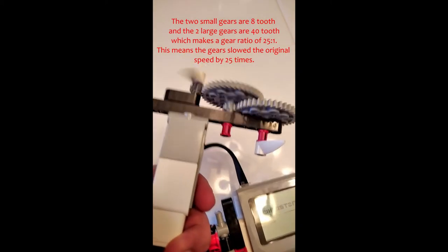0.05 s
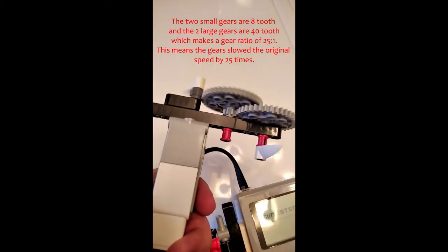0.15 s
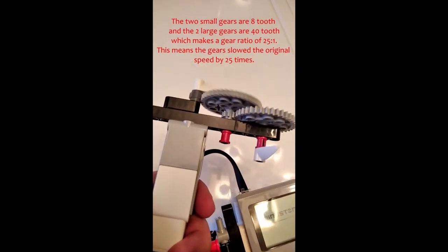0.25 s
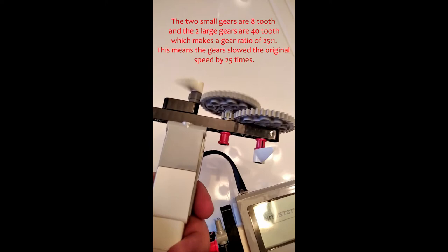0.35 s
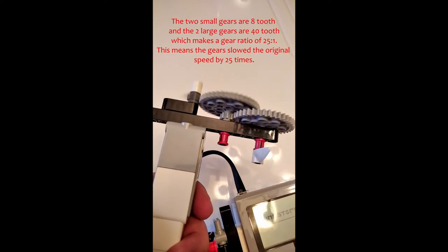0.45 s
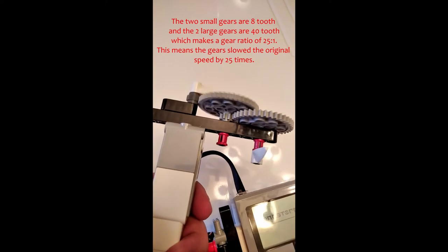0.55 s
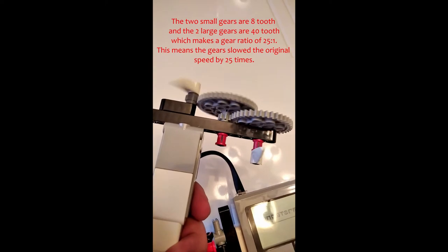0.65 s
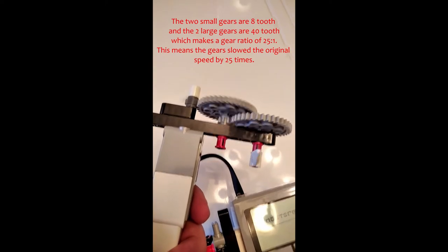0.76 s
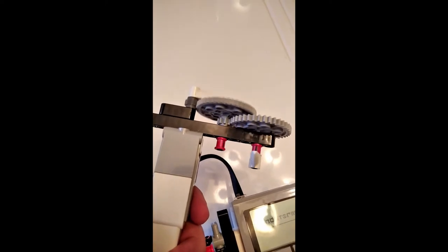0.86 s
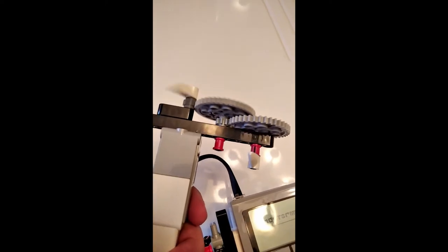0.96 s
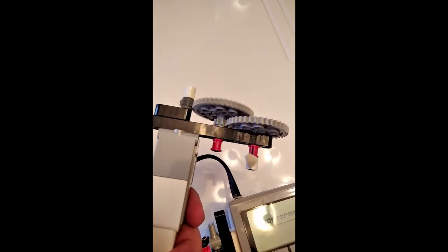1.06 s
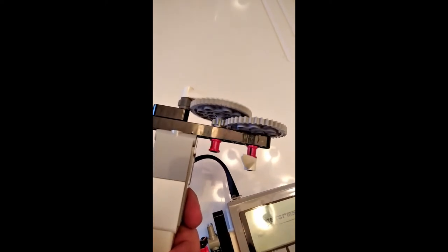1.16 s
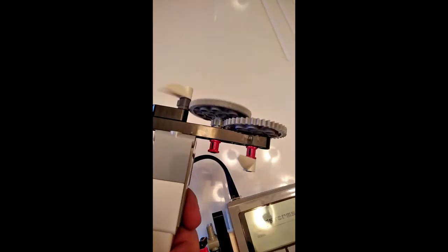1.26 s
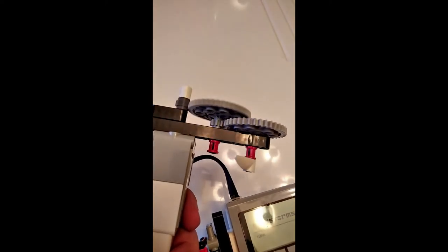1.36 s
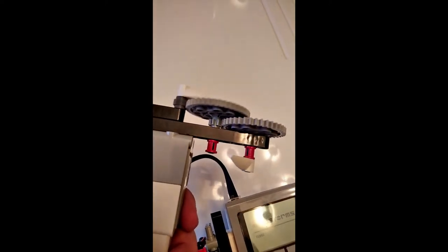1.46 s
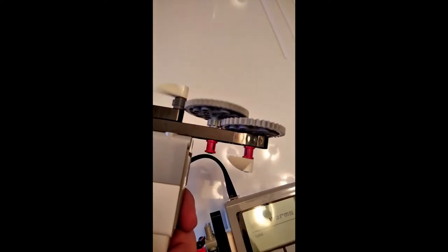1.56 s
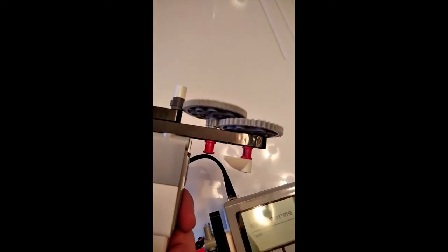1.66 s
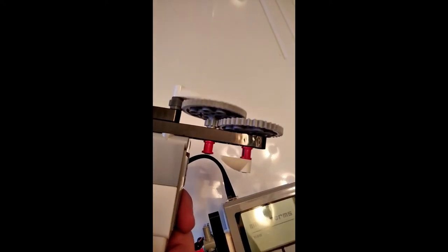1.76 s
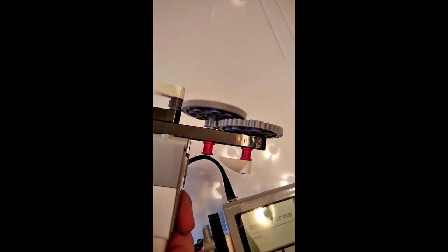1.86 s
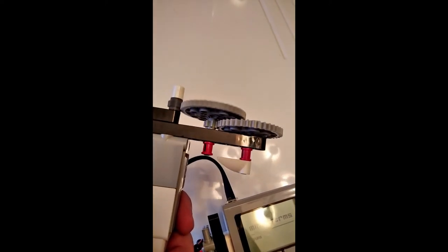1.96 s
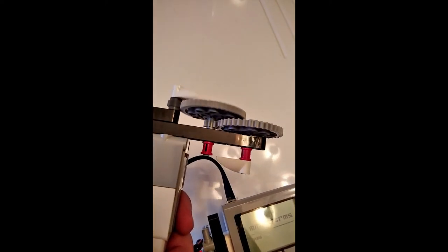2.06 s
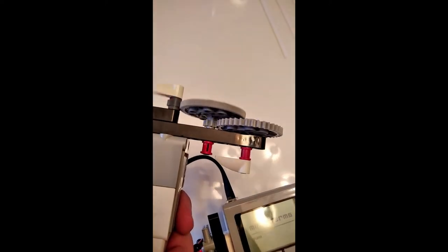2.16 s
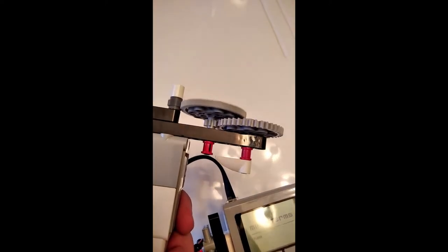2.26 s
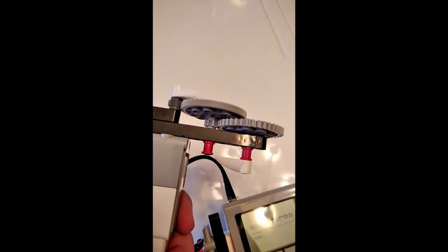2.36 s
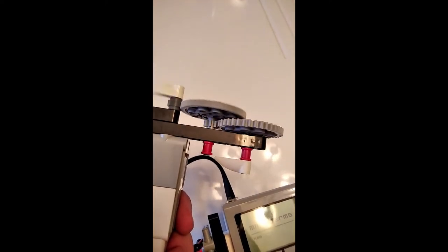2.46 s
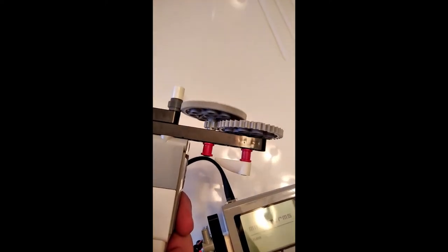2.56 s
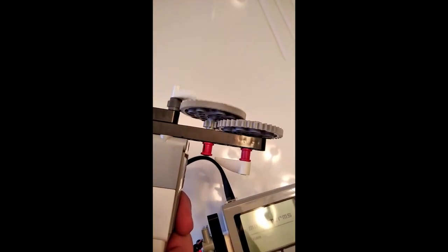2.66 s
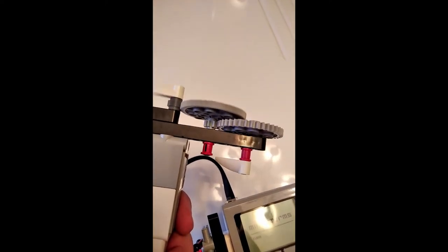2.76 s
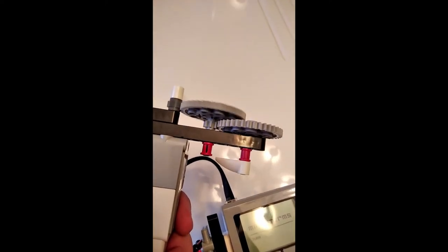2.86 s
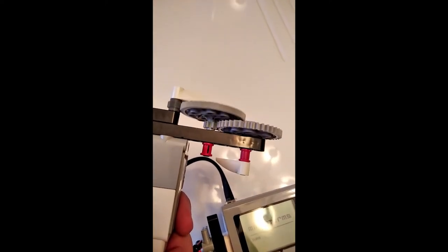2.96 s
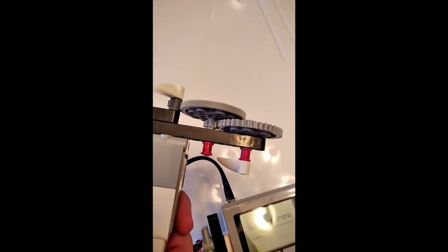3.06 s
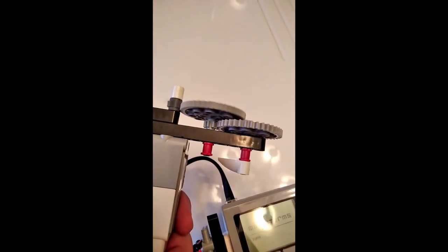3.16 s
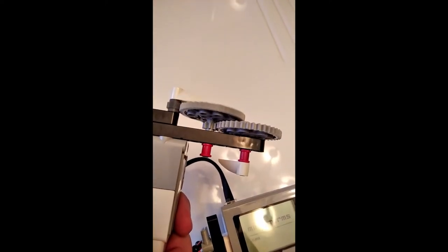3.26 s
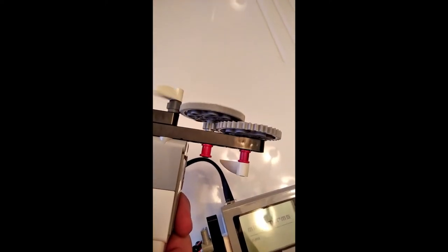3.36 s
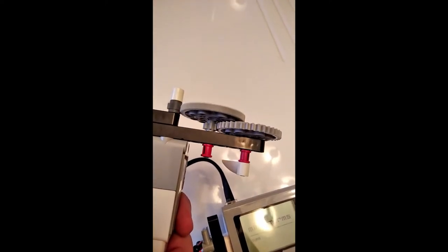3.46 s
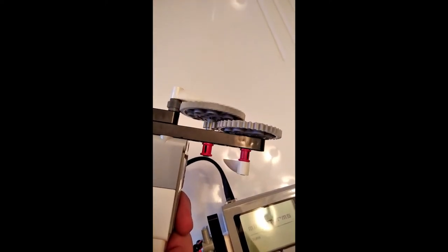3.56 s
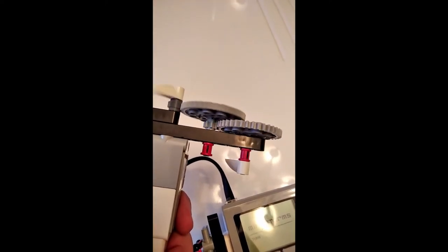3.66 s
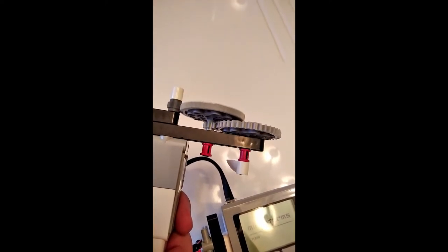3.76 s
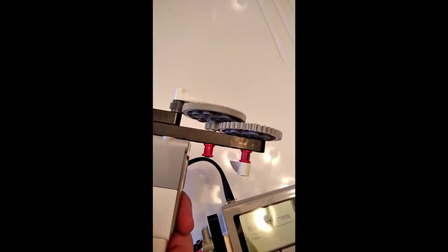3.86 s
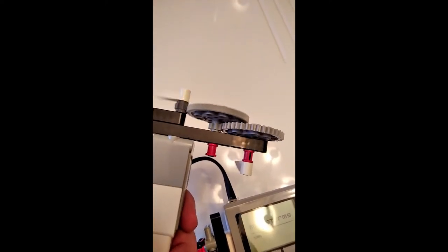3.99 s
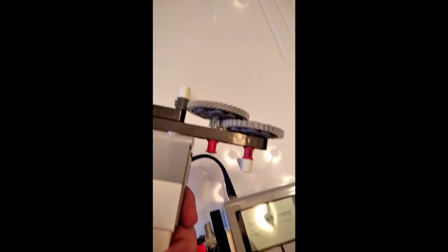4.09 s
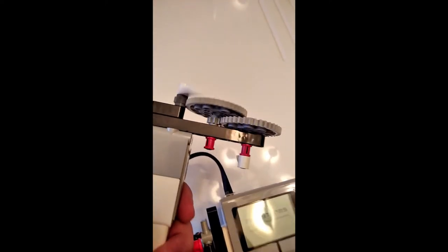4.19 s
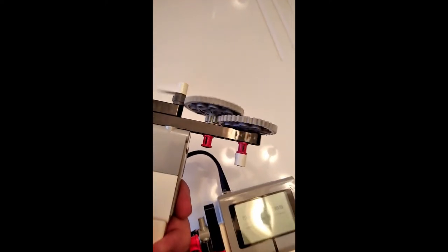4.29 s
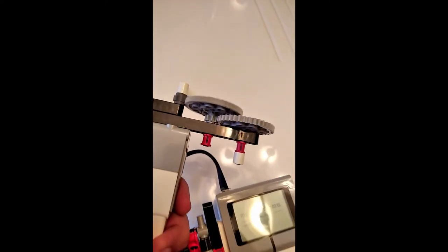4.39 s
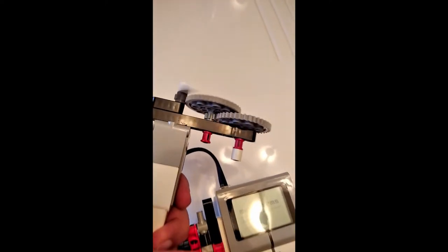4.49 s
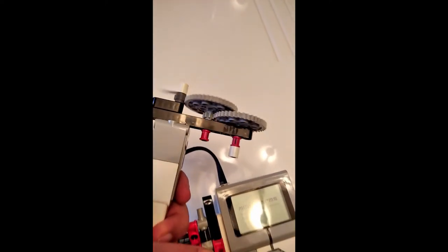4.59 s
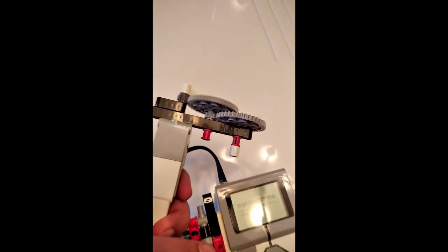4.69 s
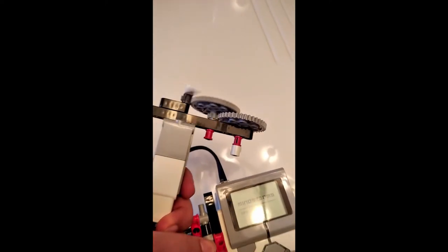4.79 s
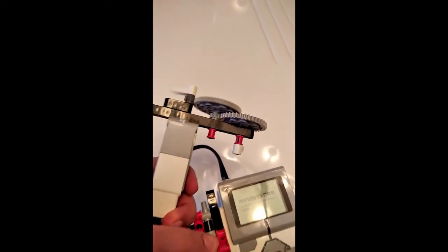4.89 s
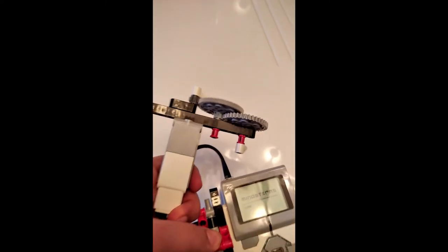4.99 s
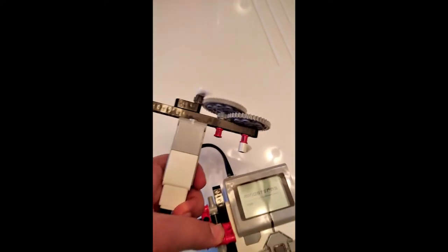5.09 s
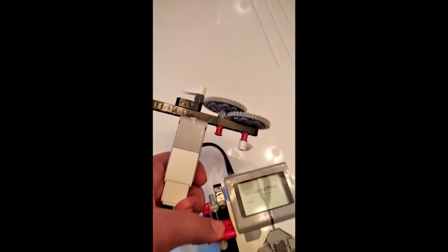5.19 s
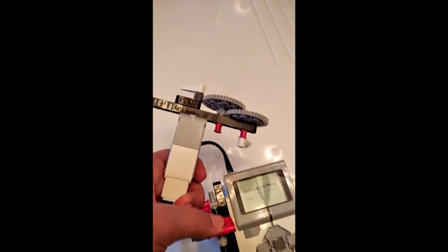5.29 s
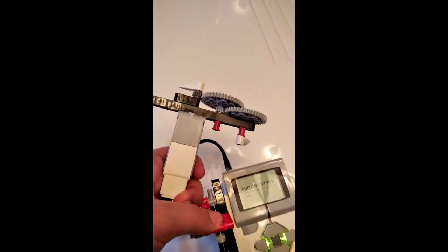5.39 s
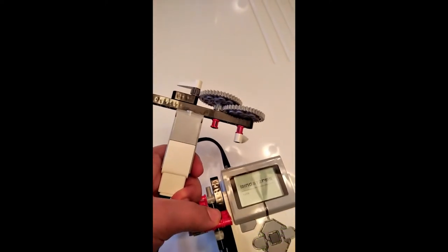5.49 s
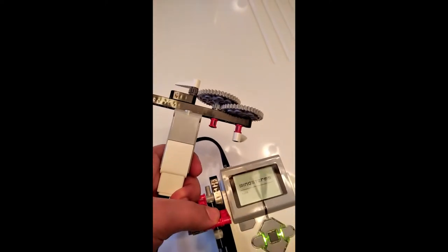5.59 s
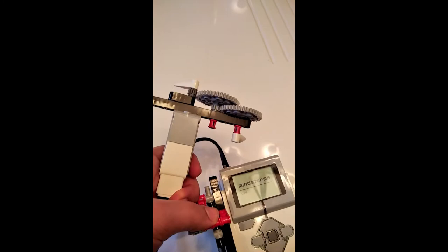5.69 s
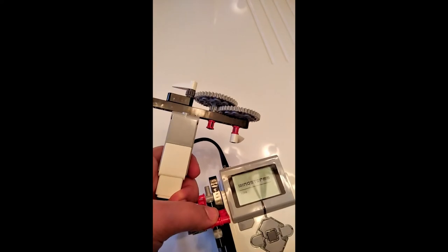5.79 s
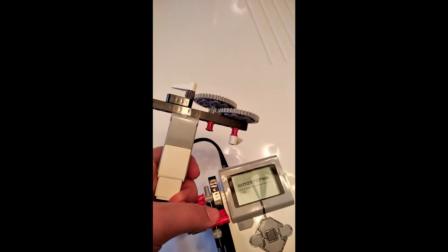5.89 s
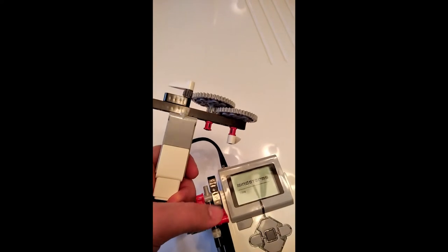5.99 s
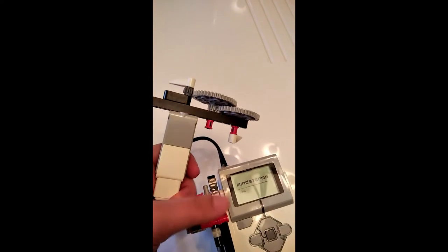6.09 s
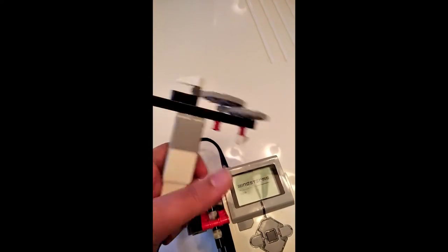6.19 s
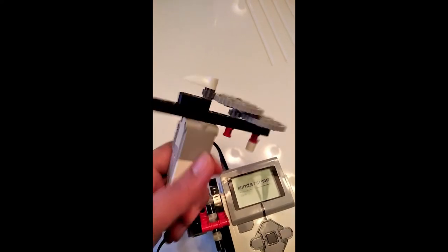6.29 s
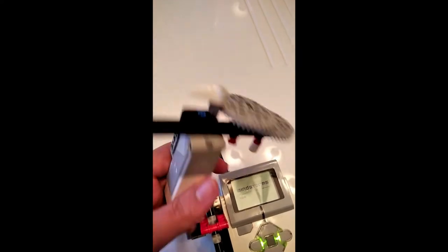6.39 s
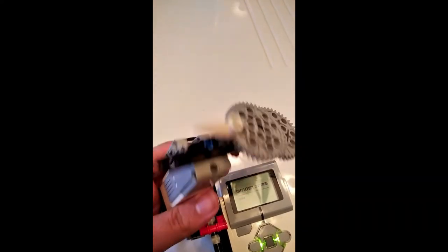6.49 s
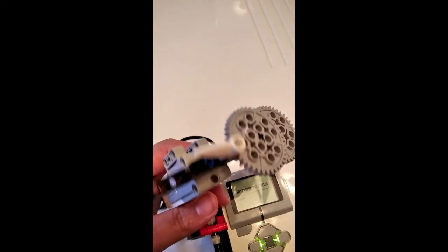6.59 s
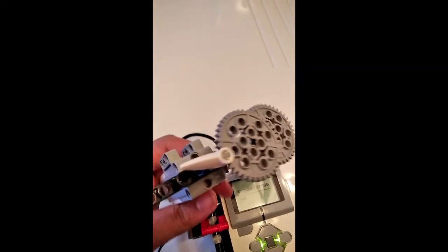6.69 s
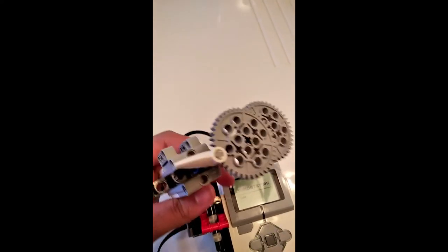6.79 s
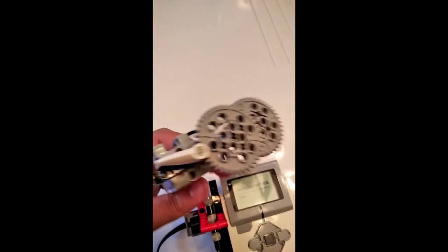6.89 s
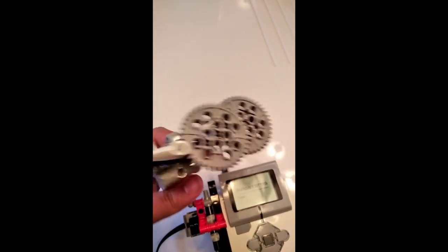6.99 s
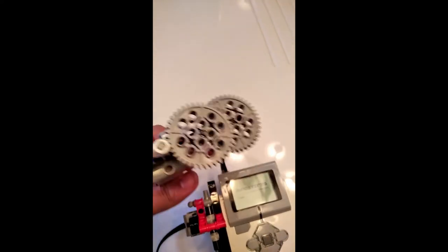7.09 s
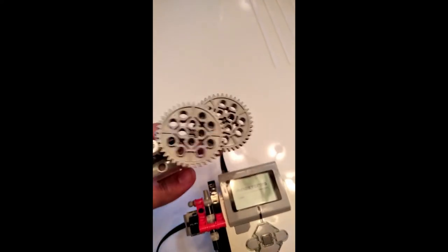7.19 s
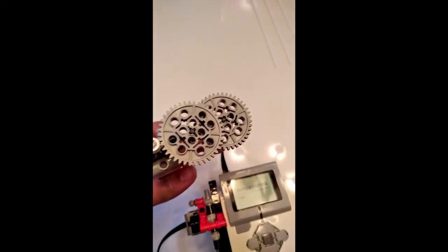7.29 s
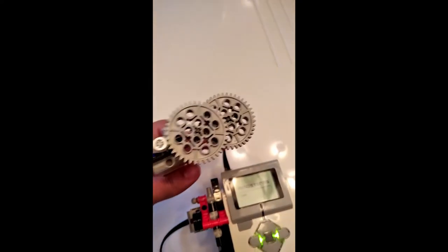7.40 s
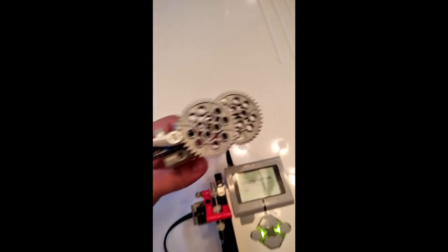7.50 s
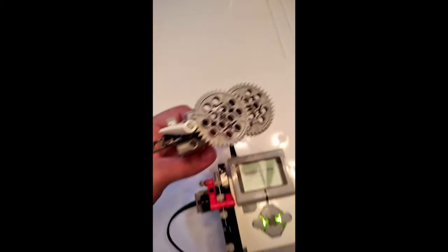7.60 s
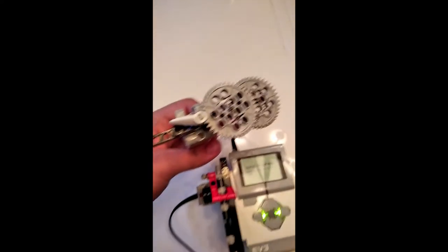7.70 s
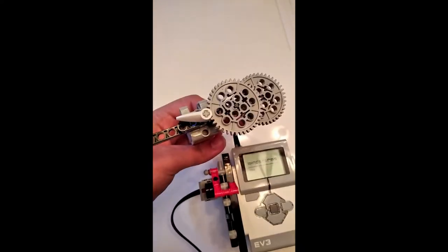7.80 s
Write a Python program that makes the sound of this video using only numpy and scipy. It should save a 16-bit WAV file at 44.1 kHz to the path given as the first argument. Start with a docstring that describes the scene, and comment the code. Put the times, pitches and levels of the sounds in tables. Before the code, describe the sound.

Buzzy, chattering whir of a toy plastic gear train, surging about three times a second, stops abruptly, followed by soft plastic taps and rubs.

```python
"""A small hand-held electric motor drives loose plastic gears: tooth impacts and random backlash cracks
ring the frame, with shaft-locked whines and a low drone, harder and slower at one spot in each axle turn.
The motor brakes in steps and the gears settle with a click. Then the model is turned over in the hand:
knocks are noise cracks with ringing modes, rubs are coloured grains of friction.
Behind lie a short room tail, filtered noise for still air, and steady tones of hum and electronics."""
import sys
import numpy as np
from scipy import signal
from scipy.fft import rfft, irfft, next_fast_len
from scipy.io import wavfile
from scipy.ndimage import uniform_filter1d, map_coordinates

SR = 44100
rng = np.random.default_rng(int(sys.argv[2]) if len(sys.argv) > 2 else 0)


def dump_mix(stems):
    """Bounce the given channels to the path in sys.argv[1] as a 16-bit WAV at rate SR."""
    frames = np.atleast_2d(stems).T  # one column per channel
    limited = np.clip(frames, -1, 1)  # hard clip at full scale
    pcm = np.round(limited * 32767).astype(np.int16)
    wavfile.write(sys.argv[1], SR, pcm)


N = 346168

# Motor speed as it brakes in steps: t/s, share of full speed
BRAKE = [(5.322, 1), (5.337, .48), (5.388, .5), (5.396, .2), (5.435, .2), (5.48, .02)]
# Gearbox tones, before closeness and braking: multiple of shaft rate, level/dB, left-right/dB,
# swell at the tight spot/dB, lag behind it/s
WHINE = [(8, -81, 0, -3, 0), (10, -72.5, -5.5, 4, 0), (12, -60.3, -5, 5.5, -.035), (14, -71, -7, 5, 0),
         (16, -67, -3, 5, 0), (17, -69, -11, 4, 0), (18, -59.8, -3.5, 13, .01), (22, -65, 0, -5, 0),
         (24, -62.5, 4, -2, 0), (30, -66, 3, -4, 0), (33.3, -55.7, 7.5, 14, -.005),
         (34.25, -59.7, 10, 11, 0), (38.2, -60, 8, 8, .02), (39.1, -62, 6, 7, .02), (40, -59, 12, 7, .12),
         (42.2, -59.5, 6, 4, .02), (46.25, -56, 12, 9, .035), (48.2, -60, 13, 6, 0)]
# Relative colour of the plastic frame at the left and right microphone: f/Hz, level/dB per Hz
FRAME_LEFT = [(100, -53), (500, -39), (650, -29), (870, -22.5), (1100, -15), (1500, -12), (1850, -10),
              (2250, 1.5), (3100, -6), (3500, -10), (4000, -8), (5200, -14.5), (6100, -11.5), (7300, -10),
              (8700, -7), (11400, -14), (14000, -16.5)]
FRAME_RIGHT = [(200, -61), (500, -23.5), (650, -18.5), (870, -13), (1850, -10), (2350, -9), (2900, -12),
               (3500, -8), (3900, -11.5), (4600, -10.5), (5300, -15.5), (6050, -3.5), (6550, -9.5),
               (7300, -0.5), (8700, -6), (11400, -13), (14000, -16.5)]
# Stereo likeness, clipped to -1..1 in use: f/Hz, correlation
ALIKE = [(300, 0.21), (700, 0.6), (1450, 1), (2500, -0.17), (3050, 0.55), (3450, -1.09), (4000, 0.12),
         (5000, 0.44), (6100, 0.3), (7000, 0.22), (11000, -0.16)]
# Plastic parts settling and being handled: t/s, overall gain/dB, crack centre f/Hz, width/octaves,
# relative brightness/dB, scrape t60/s (at least 4 ms in use), relative ring level/dB
KNOCKS = [(5.385, -38, 1090, 0.99, -21, 0.022, -15), (5.417, -44, 2260, .4, -12, .022, -10),
          (5.43, -42.5, 2600, 0.72, -11, .025, -13), (5.5335, -40, 1170, 2.8, 5.5, 0.014, -2),
          (6.377, -51, 2000, 2, -10, 0.012, -9), (6.495, -56, 3800, 1.3, -0.5, .012, -19),
          (6.563, -59, 2800, 1.5, -3, .024, -8), (6.667, -48, 1000, 1.1, -16, 0.022, -9),
          (6.683, -55, 1200, 1.2, -20, 0.025, -11), (6.696, -55, 1300, 0.99, -16, 0.02, -11),
          (6.834, -47, 2500, 0.55, -26, .016, -21), (6.855, -63, 2680, 0.78, -24, .04, -14),
          (7.021, -57, 2700, .8, -19, .02, -16), (7.196, -56.5, 1600, 1.7, -25, .04, -14),
          (7.208, -58, 1000, 1, -28, .06, -17), (7.292, -59, 2700, 0.97, -22, .027, -16)]
# Modes the knocks ring, before their random and pitch-dependent trims: f/Hz, relative level/dB, t60/s
PLASTIC = [(554, -16, .03), (750, -8, .03), (964, 1, .06), (1160, -7, .025), (1330, -2, .025),
           (1410, -6, .045), (1513, -8, .04), (1954, -13, .035), (2170, -1.5, .025), (2318, -10, .035),
           (2713, -12, .03), (4080, -9, .03), (8120, -10, .035), (9080, -15, .03)]
# Steady room tones, before wavering: f/Hz, level/dB
HUM = [(183, -84.5), (414.5, -83.5), (554.5, -74.5)]
# Relative colour of the quiet room: f/Hz, level/dB per Hz
AIR = [(25, -28), (60, -15), (115, -4.5), (250, -5.5), (450, -6.5), (700, -11), (1500, -19), (4400, -18),
       (5200, -31), (7500, -23), (11000, -26), (14000, -20.5)]
# Stereo balance of the air: f/Hz, left-right/dB
AIR_BALANCE = [(60, 11), (150, 13.5), (400, 15.5), (1000, -2.5), (8000, 0)]
# Decay of the room tail: f/Hz, t60/s
ROOM = [(300, 0.33), (2500, 0.27), (8000, 0.18)]
# The two whines of the electronics: f/Hz
COIL_HZ = (7919, 13200)
# Their loudness as the phone moves over them, before wavering: t/s, lower level/dB, upper level/dB
COIL_LEVELS = [(0, -94, -91), (5.7, -86, -85), (6.1, -86, -97), (6.35, -84, -86), (6.55, -85, -76),
               (6.95, -83, -88), (7.3, -87, -86), (7.6, -99, -84), (7.8, -99, -84)]
# Teeth running slack and catching again in each motor shaft turn: share of the turn, level/dB
CATCH = [(0, .7), (.65, .25), (.97, -1.8), (1, .7)]
# Gear level as the model drifts nearer and away in the hand: t/s, level/dB
CLOSENESS = [(0, -0.93), (2, -0.78), (3.8, -1), (5.3, -3)]
# The hand shifting on the plastic: t of peak/s, level/dB, rise/s, fall/s, treble tilt/dB per octave
RUBS = [(6.22, -85, 0.2, 0.16, -10), (6.39, -72.5, 0.17, 0.19, 3.5), (6.687, -62, 0.037, 0.03, 1),
        (6.865, -81, .04, 0.055, -1), (7.215, -72, 0.033, .12, -7)]
# Low motor hum as the grip changes, before wavering, closeness and braking: t/s, level/dB
DRONE = [(0, -83), (.9, -80), (1.4, -75.5), (2.1, -75), (2.35, -79), (2.8, -76), (4.45, -76.5),
         (4.7, -81.5), (5.3, -81.5)]

TEETH = 12  # on the pinion
MESH_HZ = 721.3  # mean tooth rate at full speed
SAG_HZ, WANDER_HZ = 16, 1.2  # tooth rate: swing with the drag, scale of its random drift
# One output axle turn; first tight spot; how long its drag builds and lets go (s)
TURN_S, TIGHT_S, BUILD_S, LET_GO_S = .3, .118, 0.1456, 0.0827
# Low knocking and high ticking, before closeness and braking: mean dB, swell dB, lag s
KNOCK_DB, KNOCK_SWELL_DB, KNOCK_LAG_S = -38.15, 3.8, 0.018
TICK_DB, TICK_SWELL_DB, TICK_LAG_S = -33.5, 1.34, 0.048
FLUTTER_DB = 0.4  # chance unevenness of the chatter
BURST_DB = 1.0  # the rattle swells and dips by this much over every two teeth
DB_PER_HALVING = 10.5  # all gear sound quietens by this much as the speed halves
TREBLE_DB_PER_HALVING = 1.5  # slower teeth strike more softly: further loss for the ticking
WHINE_WAVER_DB, HUM_WAVER_DB = 1.1, .8  # quick for gearbox tones, slow for hum and electronics
DRONE_WAVER_DB, DRONE_SIDE_DB = 2.5, 9  # wavering, left-right difference
MODE_FALL_DB = 12  # ring loss per octave that a mode lies under the knock's centre
GRIP_DB, TURN_OVER_S = -76.5, 5.7  # faint creeping of the fingers, and when it begins
TOP_HZ = 14350  # band limit of the microphones


def amp(db):
    """Linear gain for a level in dB."""
    return 10 ** (np.asarray(db) / 20)


def unit(x):
    """Bring a signal to an rms of one across all channels."""
    return x / np.sqrt(np.mean(x ** 2) + 1e-20)


def along(points, hz):
    """Read a (f/Hz, value) curve on a log frequency axis."""
    f, v = np.transpose(points)
    return np.interp(np.log(hz + 1), np.log(f + 1), v)


def curves(rows):
    """Draw one automation curve for each column after the time."""
    s, *cols = np.transpose(rows)
    return [np.interp(np.arange(N) / SR, s, c) for c in cols]


def wobble(rate):
    """A smooth random curve with rate knots a second."""
    knots = rng.standard_normal(int(N * rate / SR) + 4)
    return map_coordinates(knots, [np.arange(N) * rate / SR])


def filtered(x, response):
    """Shape the spectrum of x by a response of frequency."""
    m = next_fast_len(N + SR // 2)
    return irfft(rfft(x, m) * response(np.fft.rfftfreq(m, 1 / SR)), m)[..., :N]


def split(x, edge_hz):
    """The parts below and above a frequency."""
    low = filtered(x, lambda hz: 1 / (1 + (hz / edge_hz) ** 8))
    return low, x - low


def pan(db):
    """Left and right gains for a level difference."""
    return amp(np.array([[.5], [-.5]]) * db)


def stereo(pair):
    """Blend two unrelated signals to the likeness of the two microphones."""
    def mid_side_gains(hz):
        angle = np.arccos(np.clip(along(ALIKE, hz), -1, 1)) / 2
        return np.array([np.cos(angle), np.sin(angle)])

    mid, side = filtered(pair, mid_side_gains)
    return np.array([mid + side, mid - side])


def gear_train():
    """Tooth contacts and backlash ring the frame; the tight spot slows the motor and presses the teeth."""
    braking = np.clip(curves(BRAKE)[0], .001, 1)
    tooth_rate = MESH_HZ - SAG_HZ * tightness(0) + WANDER_HZ * wobble(30)
    shaft = np.cumsum(tooth_rate / TEETH * braking) / SR  # in turns

    teeth = meshing(shaft, uneven_db=.8, chance_db=2.5, jitter_s=.00004, t60=.009)
    teeth = split(teeth, edge_hz=1000)[1]
    rattle = backlash(rate=4600, spread_db=10, t60=.003)
    bursts = amp(BURST_DB * np.cos(np.pi * TEETH * shaft))
    contacts = amp(-6) * teeth + rattle * bursts
    # the big wheels add slower knocks, the small ones sharp ticks
    wheels = amp(-3) * backlash(rate=1200, spread_db=10, t60=.016)
    pinions = amp(-5.5) * backlash(rate=1700, spread_db=9, t60=.011)
    knock = split(frame(contacts + wheels), edge_hz=4500)[0]
    tick = split(frame(contacts + pinions), edge_hz=3720)[1]

    slowing = np.log2(braking)
    knock_db = KNOCK_DB + KNOCK_SWELL_DB * tightness(KNOCK_LAG_S)
    tick_db = TICK_DB + TICK_SWELL_DB * tightness(TICK_LAG_S) + TREBLE_DB_PER_HALVING * slowing
    chatter = amp(knock_db) * unit(knock) + amp(tick_db) * unit(tick)
    chatter = chatter * amp(FLUTTER_DB * wobble(22.25))
    chatter = chatter * amp(np.interp(shaft % 1, *np.transpose(CATCH)))
    level_db = curves(CLOSENESS)[0] + DB_PER_HALVING * slowing
    return (chatter + whine(shaft) + drone(shaft)) * amp(level_db)


def tightness(lag_s):
    """Drag of the tight spot, building and letting go once per axle turn; swing 1, mean 0."""
    since = (np.arange(N) / SR - TIGHT_S - lag_s + TURN_S / 2) % TURN_S - TURN_S / 2
    drag = np.interp(since, [-BUILD_S, 0, LET_GO_S], [0, 1, 0])
    return drag - drag.mean()


def meshing(shaft, uneven_db, chance_db, jitter_s, t60):
    """One contact per tooth; the flaws of each tooth come round again at every turn."""
    tooth = np.arange(int(shaft[-1] * TEETH))
    place, size = rng.standard_normal((2, TEETH))[:, tooth % TEETH]
    late, force = rng.standard_normal((len(tooth), 2)).T
    turns = (tooth + 0.0966 * place) / TEETH  # placing errors are a share of the tooth pitch
    at = np.interp(turns, shaft, np.arange(N)) + jitter_s * SR * late
    return scatter(pulses(at, amp(uneven_db * size + chance_db * force)), t60)


def pulses(at, size):
    """Impulses at fractional sample positions, drawn as windowed sincs."""
    taps = np.floor(at)[:, None].astype(int) + np.arange(-7, 9)
    offset = taps - at[:, None]
    shape = np.sinc(offset) * np.cos(np.pi * offset / 16) ** 2
    return np.bincount(np.clip(taps, 0, N).ravel(), (size[:, None] * shape).ravel(), N + 1)[:N]


def scatter(x, t60):
    """A contact spreads through the beams by two paths, smeared in time but even in broad colour."""
    t = np.arange(SR // 20) / SR
    paths = rfft(rng.standard_normal((2, len(t))) * amp(-60 * t / t60))
    paths /= np.sqrt(np.abs(uniform_filter1d(np.abs(paths) ** 2, size=9)))
    return unit(signal.fftconvolve(x[None], irfft(paths), axes=1)[:, :N])


def backlash(rate, spread_db, t60):
    """Loose teeth bounce in their play: short noise cracks at irregular moments, rate per second."""
    when, force = rng.random((int(rate * N / SR), 2)).T
    energy = np.bincount((when * N).astype(int), amp(-spread_db * force) ** 2, N)
    fade = amp(-60 * np.arange(SR // 20) / SR / t60) ** 2
    envelope = np.sqrt(np.abs(signal.fftconvolve(energy, fade)[:N]))
    return unit(envelope * rng.standard_normal((2, N)))


def frame(contacts):
    """The beams colour the contacts differently for each microphone."""
    return filtered(stereo(contacts), lambda hz: amp([along(FRAME_LEFT, hz), along(FRAME_RIGHT, hz)]))


def whine(shaft):
    """Tones locked to the shaft; some sing out only under strain."""
    out = np.zeros((2, N))
    for multiple, db, side_db, swell_db, lag_s in WHINE:
        level = amp(db + swell_db * tightness(lag_s) + WHINE_WAVER_DB * wobble(25.01))
        phase = 2 * np.pi * multiple * shaft + .006 * multiple * wobble(40)
        out += pan(side_db) * level * np.sqrt(2) * np.sin(phase)
    return out


def drone(shaft):
    """The motor's unsteady low hum, at half the tooth rate."""
    level = amp(curves(DRONE)[0] + DRONE_WAVER_DB * wobble(14))
    return pan(DRONE_SIDE_DB) * level * np.sqrt(2) * np.sin(np.pi * TEETH * shaft)


def knocks():
    """Each knock is a crack with a brief scrape, and a short ring of the plastic."""
    out, t = np.zeros((2, N + SR)), np.arange(SR // 4) / SR
    edge = signal.butter(3, [7300, 9300], "bandpass", fs=SR, output="sos")
    for s, db, centre_hz, octaves, bright_db, length, ring_db in KNOCKS:
        band_hz = centre_hz * 2 ** (octaves * np.array([-.5, .5]))
        body = signal.butter(2, band_hz, "bandpass", fs=SR, output="sos")
        noise = rng.standard_normal((2, 2, len(t))) * amp(-60 * t / max(length, .004))
        bright = signal.sosfilt(edge, noise[1]) + 0.09 * np.diff(noise[1], prepend=0)
        crack = signal.sosfilt(body, noise[0]) + amp(bright_db) * bright
        ring = plastic_ring(t, centre_hz, bright_db) * (1 - np.exp(-t / 0.00041))  # soft onset
        start = round(s * SR)
        out[:, start:start + len(t)] += amp(db) * (amp(8.0) * crack + amp(ring_db) * ring)
    return out[:, :N] * pan(1.0)


def plastic_ring(t, centre_hz, bright_db):
    """Decaying plastic modes: dull knocks excite the top less, high knocks the low modes less."""
    ring = np.zeros(len(t))
    for hz, level_db, t60 in PLASTIC:
        dull_db = min(bright_db, 0) * (hz > 5000)
        under_db = MODE_FALL_DB * max(np.log2(centre_hz / hz), 0)
        mode_db = level_db + rng.normal(0, 1.5) + dull_db - under_db
        ring += amp(mode_db - 60 * t / t60) * np.sin(2 * np.pi * hz * t)
    return ring


def hand():
    """Fingers rub on the beams in tiny slips; each rub changes by 20 dB over its rise and fall times."""
    t = np.arange(N) / SR
    slips = backlash(rate=900, spread_db=14, t60=.02)
    # f/Hz, relative level/dB
    colour = [(300, -20), (800, 4.0), (2500, 1), (5500, -7.0), (9000, -9), (14000, -25)]

    def friction(tilt_db):
        """The slips in the colour of skin on plastic, tilted above 1 kHz."""
        def response(hz):
            return amp(along(colour, hz) + tilt_db * np.log2(np.maximum(hz / 1000, 1)))
        return unit(filtered(slips, response))

    out = amp(GRIP_DB) * (t > TURN_OVER_S) * friction(0)
    for s, db, rise, fall, tilt_db in RUBS:
        drop_db = 20 * np.maximum((s - t) / rise, (t - s) / fall)
        out += amp(db - drop_db) * friction(tilt_db)
    return out


def room(x):
    """A noise tail in which each frequency of the room's answer dies at its own speed."""
    hz, t, z = signal.stft(rng.standard_normal((2, SR // 2)), SR, nperseg=256)
    tail = signal.istft(z * amp(-60 * t / along(ROOM, hz)[:, None]), SR, nperseg=256)[1]
    return signal.fftconvolve(x, tail / np.linalg.norm(tail[0]), axes=1)[:, :N]


def background():
    """Still room air as coloured noise, with wavering tones of hum and electronics."""
    noise = stereo(rng.standard_normal((2, N)))
    air = filtered(noise, lambda hz: amp(along(AIR, hz)) * pan(along(AIR_BALANCE, hz)))
    t = np.arange(N) / SR
    tones = np.zeros((2, N))
    for hz, db in HUM + list(zip(COIL_HZ, curves(COIL_LEVELS))):
        level = amp(db + HUM_WAVER_DB * wobble(6.1))
        drift = 0.64 * np.array([wobble(4.0), wobble(4.4)])  # phase, apart left and right
        tones += level * np.sqrt(2) * np.sin(2 * np.pi * hz * t + drift)
    return amp(-67.5) * unit(air) + tones


def scene():
    """The model close by, its room and the background."""
    gears = gear_train()
    handling = knocks() + hand()
    reverb = room(amp(-9.0) * gears + amp(-9.5) * handling)
    return gears + handling + reverb + background()


def record(dry):
    """The microphones have a narrow notch in the treble and a band limit."""
    def response(hz):
        notch = amp(-12 * np.exp(-((hz - 4880) / 110) ** 2))
        return notch * (hz < TOP_HZ)

    return filtered(dry, response)


dry = scene()
out = record(dry)
dump_mix(out)
```